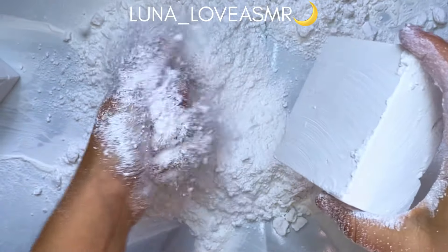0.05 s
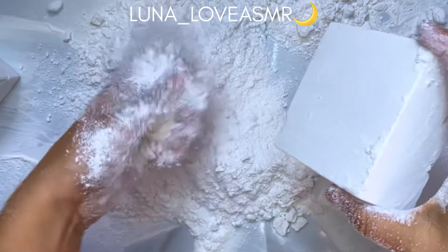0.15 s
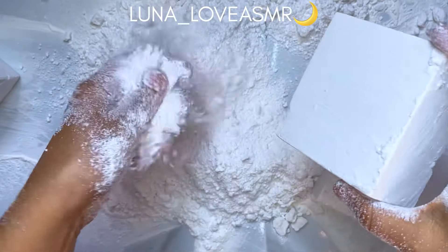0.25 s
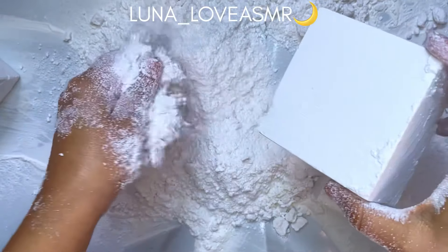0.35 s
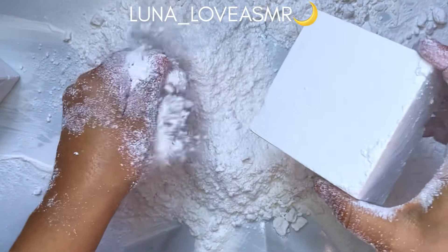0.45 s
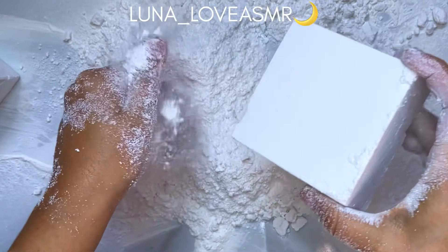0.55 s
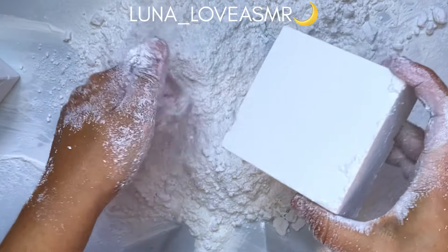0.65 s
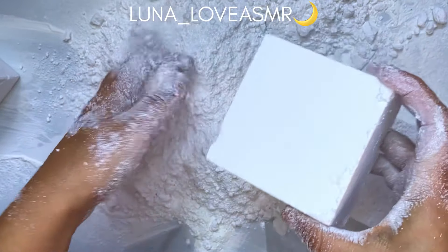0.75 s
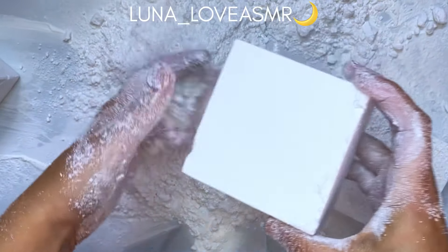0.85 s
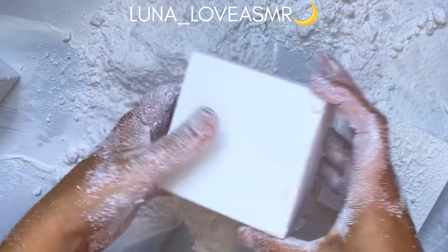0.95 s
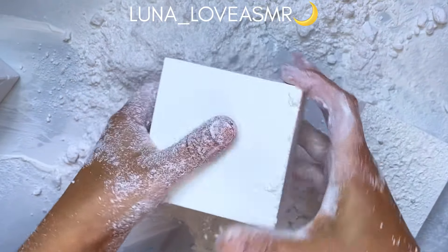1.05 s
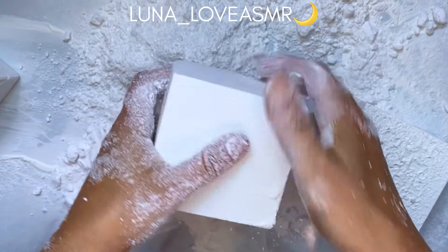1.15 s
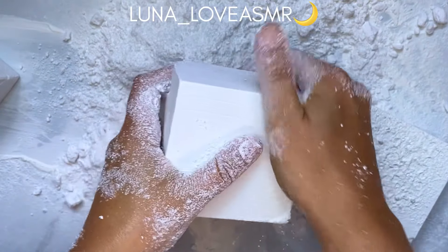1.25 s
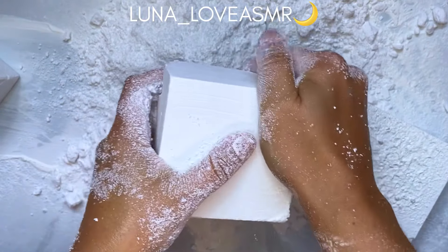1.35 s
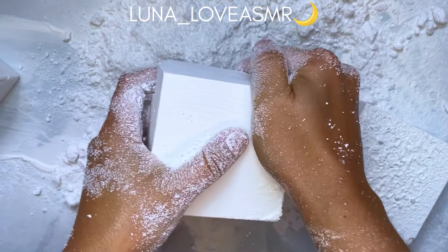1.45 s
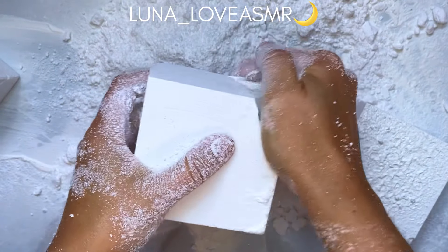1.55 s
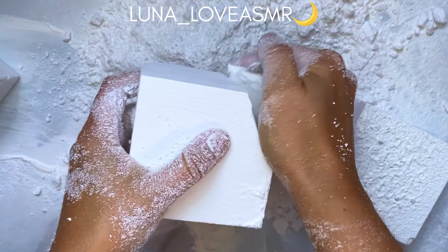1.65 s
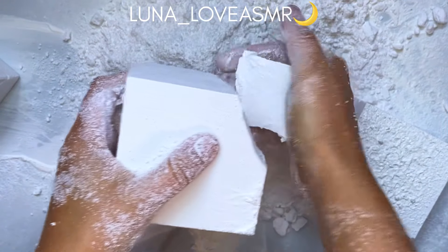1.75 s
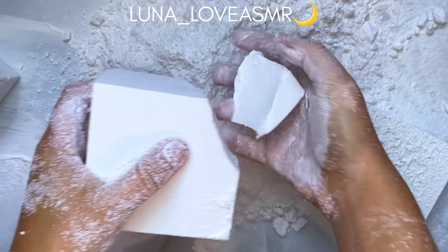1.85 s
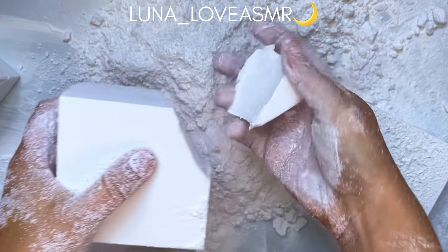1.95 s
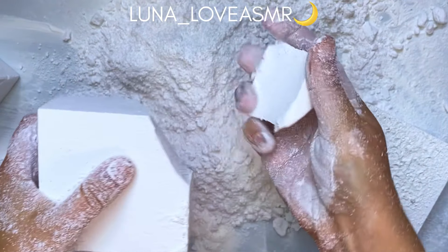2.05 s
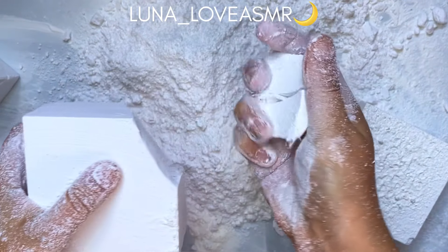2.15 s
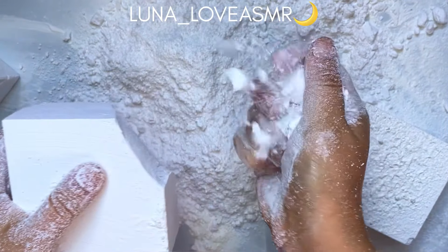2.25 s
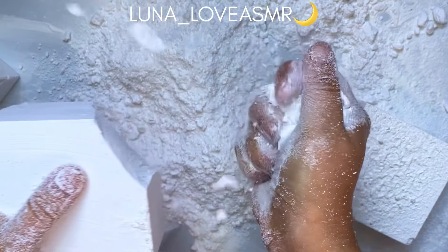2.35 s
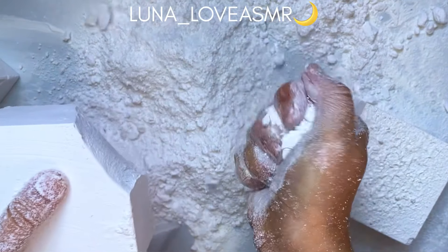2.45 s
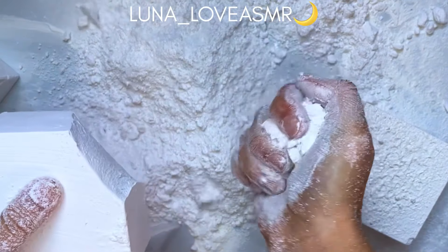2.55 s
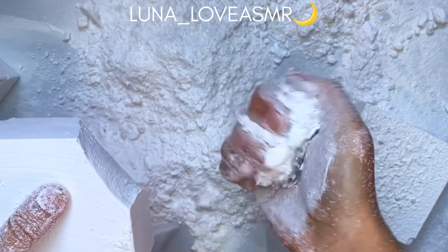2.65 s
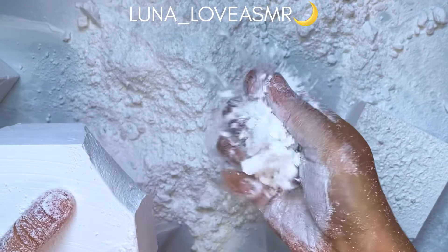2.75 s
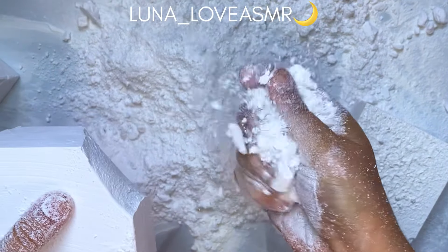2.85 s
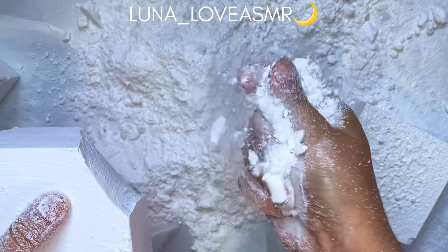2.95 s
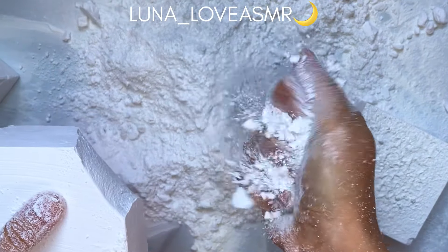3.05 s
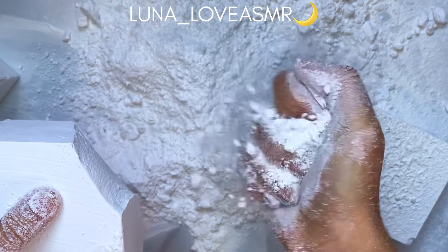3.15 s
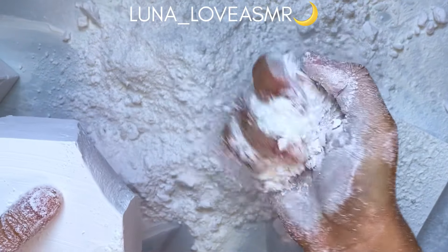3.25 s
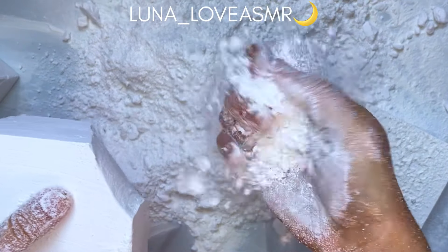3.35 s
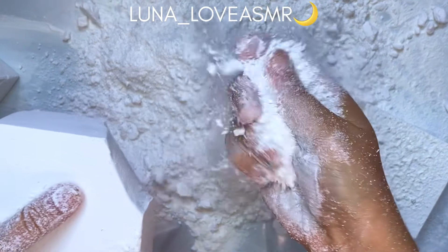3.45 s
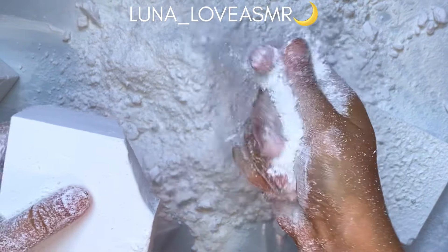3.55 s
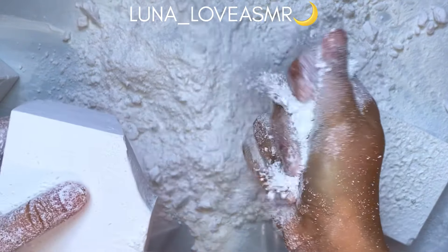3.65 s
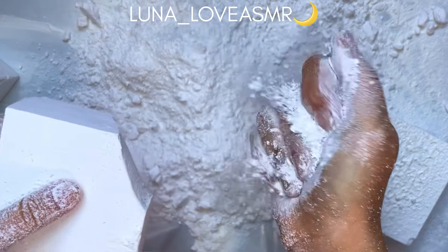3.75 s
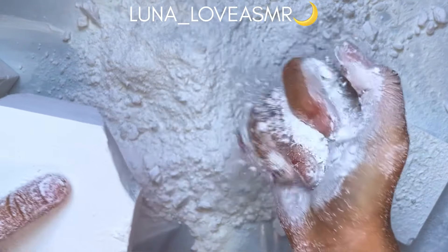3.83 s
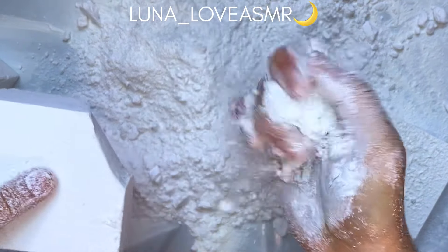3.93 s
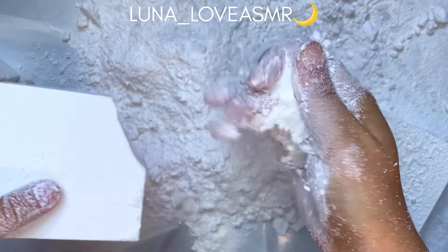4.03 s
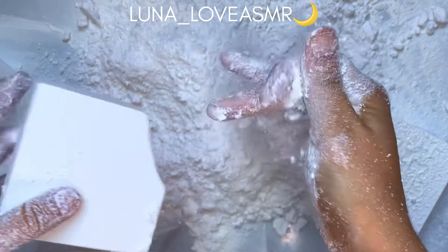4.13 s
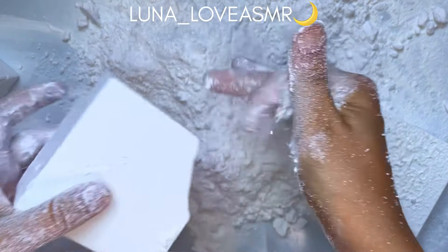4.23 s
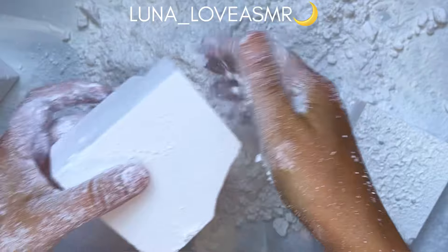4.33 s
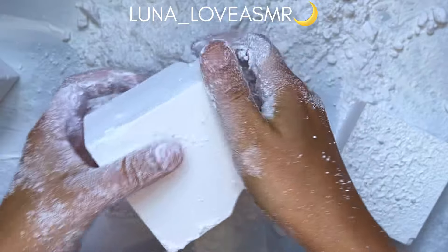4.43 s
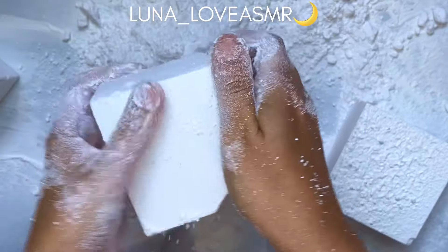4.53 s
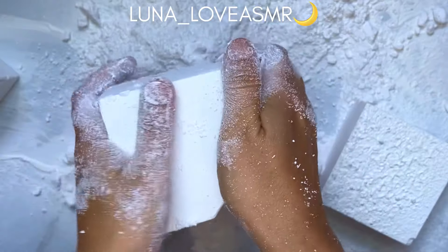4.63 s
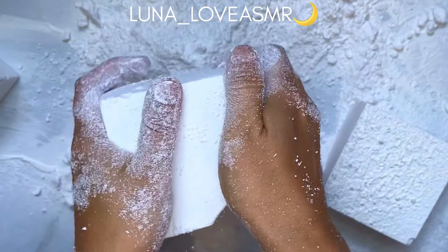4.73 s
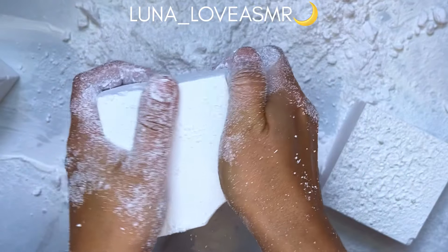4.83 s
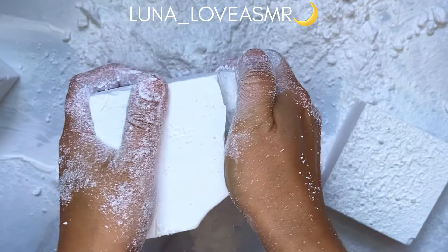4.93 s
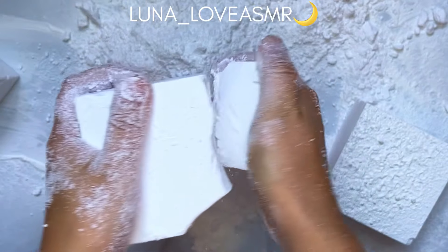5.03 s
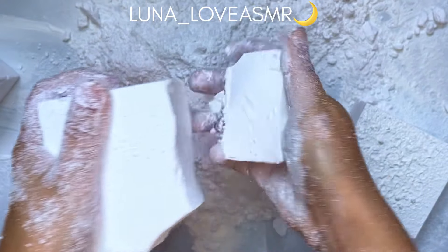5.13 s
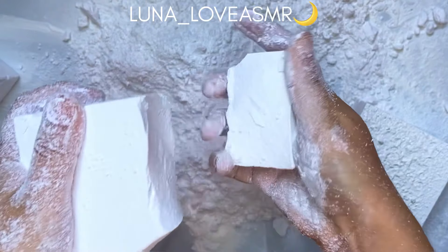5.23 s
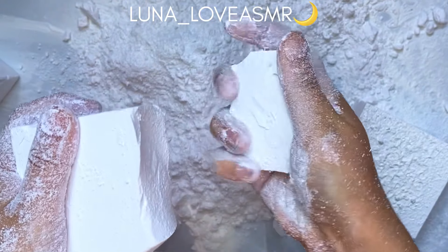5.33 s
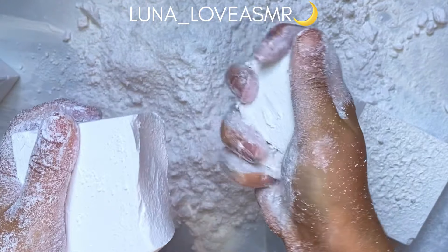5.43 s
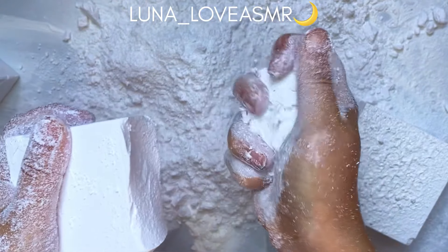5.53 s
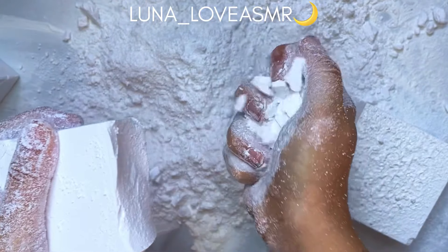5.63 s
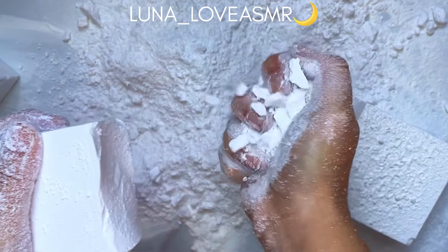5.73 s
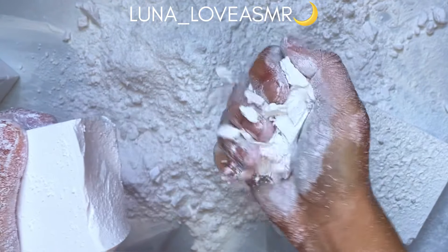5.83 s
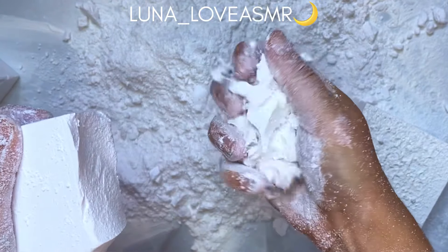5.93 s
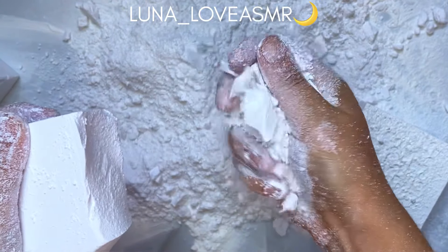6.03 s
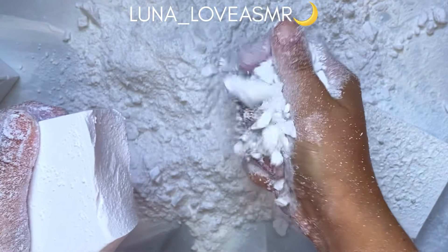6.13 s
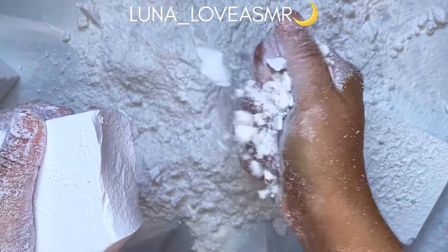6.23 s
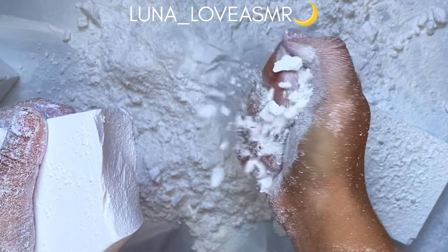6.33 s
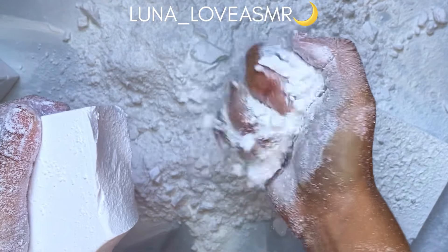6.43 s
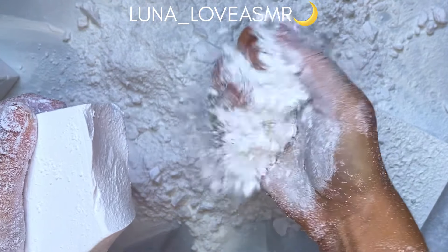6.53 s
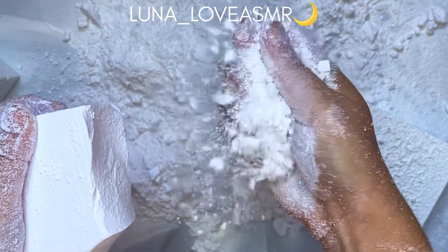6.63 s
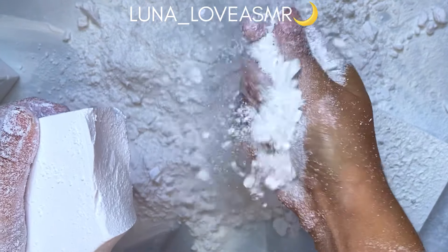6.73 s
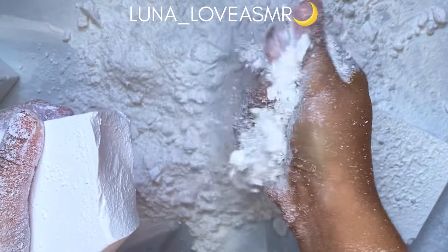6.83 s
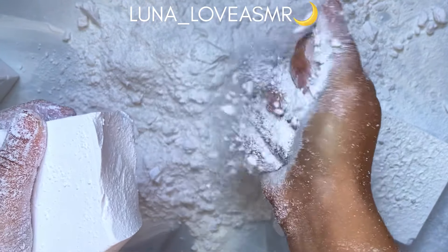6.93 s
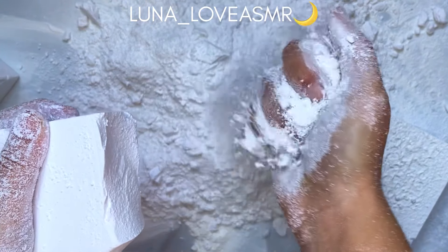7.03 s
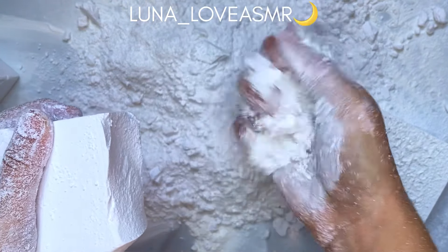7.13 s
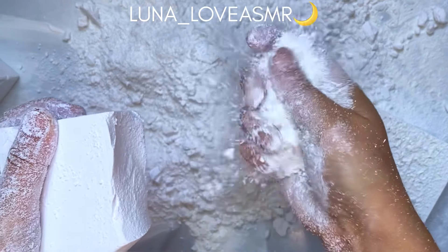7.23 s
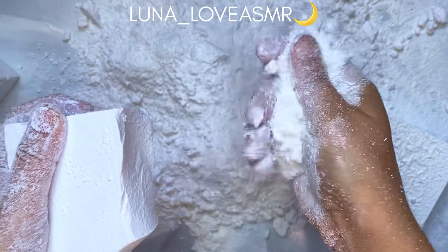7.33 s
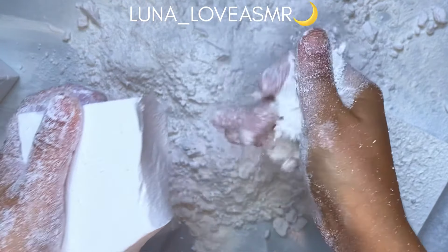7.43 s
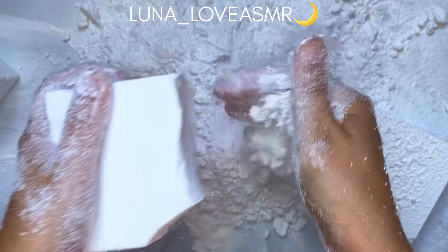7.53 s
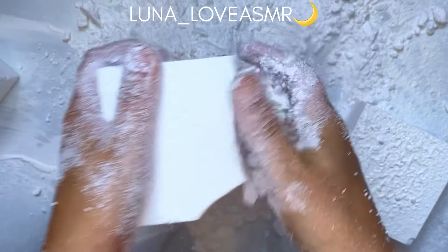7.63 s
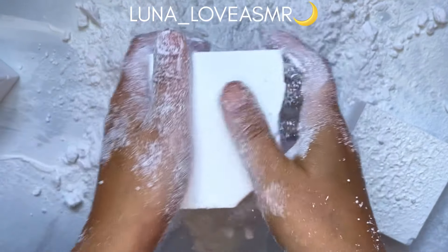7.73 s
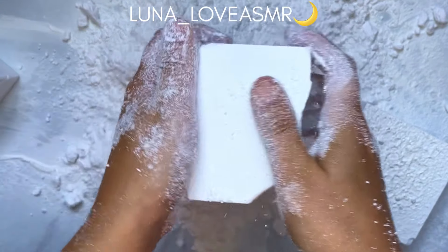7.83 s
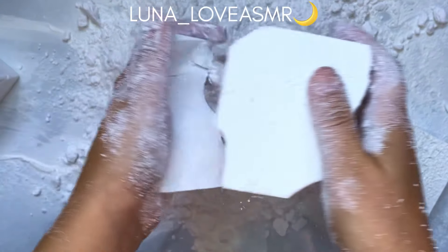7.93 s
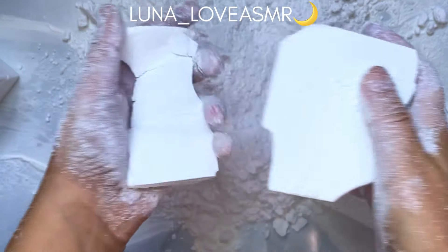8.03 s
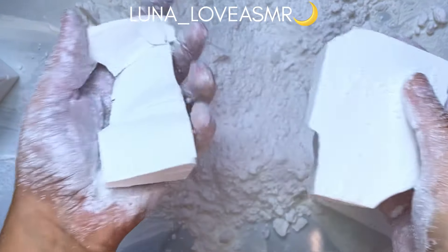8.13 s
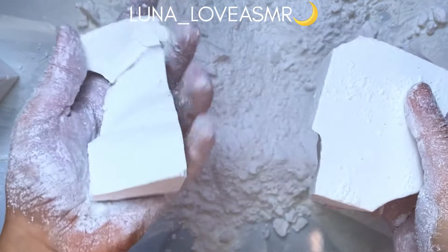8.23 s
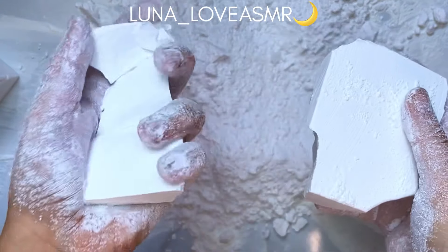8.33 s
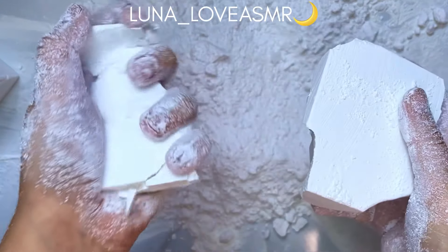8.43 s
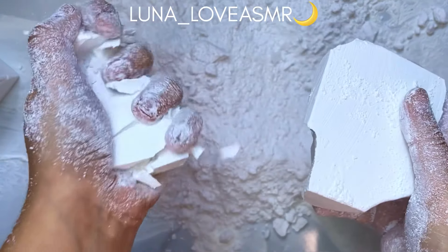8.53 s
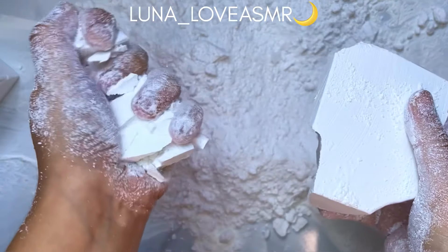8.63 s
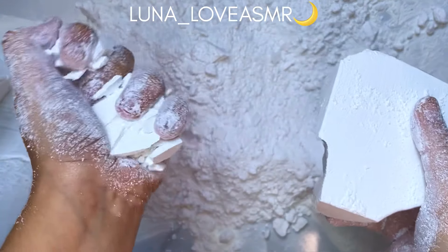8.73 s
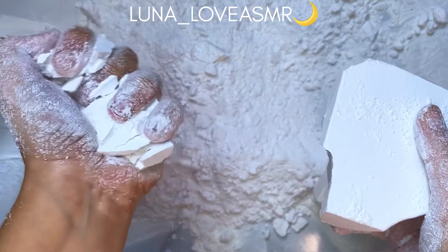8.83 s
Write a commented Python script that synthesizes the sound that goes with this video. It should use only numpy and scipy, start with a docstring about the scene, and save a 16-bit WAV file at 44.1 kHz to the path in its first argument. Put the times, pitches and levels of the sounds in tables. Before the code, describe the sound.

Close, dry stereo in a quiet room with a very faint low hum. From 0 to 1 second, only soft powder rubbing and sparse falling crumbs. Around 1.0-1.2, light knocks and scrapes of the handled block. At 1.5 a firm, dull snap with a short gritty scrape. At 2.15-2.3 the piece is crushed in loud, sharp, overlapping crunches, spilling tiny clicks; smaller ticks, grit and powder hiss fade through 4.2. Soft scrapes near 4.5, then a crisp snap with a dull thump at 4.7-4.85. At 5.35-5.6 bright, hard cracks and thumps, followed by dense grinding, crackles and pattering crumbs, thinning until 7.5. A scrape and low bump at 7.75-7.9, a brief lull, then sharp crushing at 8.35-8.65 with a strong crack near 8.46, ending in small crumbling ticks.

```python
"""In a quiet room with a low hum, hands snap soft chalk and crush it, close to a phone with two microphone ports.
Each break is a crack lasting milliseconds, a ringing burst of noise, then a spill of tiny clicks.
Dull thumps of block and lumps are sinking tones; scrapes are grainy noise ringing like block or piece.
In between, grit grinds in the fist, powder hisses and crumbs patter down: clicks filtered to each colour."""
import sys
import numpy as np
from scipy import signal
from scipy.fft import rfft, irfft
from scipy.io import wavfile
from scipy.ndimage import uniform_filter1d, map_coordinates

SR = 44100
rng = np.random.default_rng(int(sys.argv[2]) if len(sys.argv) > 2 else 0)


def transcribe(signal):
    """Save signal, clipped to [-1, 1], as a 16-bit WAV file at the path in sys.argv[1]."""
    frames = np.atleast_2d(signal).T
    limited = np.clip(frames, -1, 1)
    pcm = np.round(limited * 32767).astype(np.int16)
    wavfile.write(sys.argv[1], SR, pcm)


N = 391608
TIME = np.arange(N) / SR
SHOT = TIME[:8192]  # time axis of one short sound


def undb(db):
    """Turn decibels into gain."""
    return 10 ** (np.asarray(db) / 20)


def unit(x):
    """Scale to an average strength (rms) of 1."""
    return x / np.sqrt(np.mean(x ** 2) + 1e-20)


def bins(x):
    """Frequencies in Hz of the spectrum of x, with zero raised to 1 so logarithms work."""
    return np.maximum(np.fft.rfftfreq(x.shape[-1], 1 / SR), 1)


def colour(x, points, extra_db=0):
    """Filter with the given (Hz, dB) outline; folding the cepstrum stops it ringing ahead of the sound."""
    hz, db = np.transpose(points)
    outline_db = np.interp(np.log(bins(x)), np.log(hz), db) + extra_db
    cepstrum = irfft(np.log(undb(outline_db)))
    half = len(cepstrum) // 2
    cepstrum[1:half] *= 2
    cepstrum[half + 1:] = 0
    return irfft(rfft(x) * np.exp(rfft(cepstrum)))


def walk(rate):
    """Smooth random drift with spread 1, taking about `rate` new values a second."""
    k = int(SR / rate)
    steps = np.repeat(rng.standard_normal(N // k + 1), k)
    smooth = uniform_filter1d(uniform_filter1d(steps, k), k // 2)
    return unit(smooth[:N])


def grains(size, per_s, spread_db):
    """Random clicks of either sign; a positive spread makes a few extra large, a negative one a few extra small."""
    strength = undb(spread_db * np.minimum(rng.exponential(size=size), 5))
    happens = rng.random(size) < per_s / SR
    return unit(happens * rng.standard_normal(size) * strength)


def add(track, s, sound):
    """Mix a sound in at time s."""
    i = max(int(s * SR), 0)
    track[i:i + len(sound)] += sound[:N - i]


# tone of the quiet room rumble: (f/Hz, level/dB)
ROOM_COLOUR = [(20, 1.5), (45, 5), (62, 6), (100, 1.5), (160, -6), (350, -15), (700, -13.5), (2000, -26.5),
               (6000, -58), (16000, -30.5)]


def background(hum_hz=51.1, hum_db=-47.5, waver_db=1.26, waver_hz=0.25, room_db=-59.0):
    """A low hum, wavering slightly in pitch and level, over the filtered noise of the room's rumble."""
    phase = 2 * np.pi * np.cumsum(hum_hz + waver_hz * walk(9.2)) / SR
    hum = unit(np.sin(phase)) * undb(hum_db + waver_db * walk(13))
    rumble = unit(colour(rng.standard_normal(N), ROOM_COLOUR))
    return hum + undb(room_db) * rumble


def gestures(rows, attack_s, release_s, idle_db):
    """Level in dB of (start, length, dB) gestures that swell, hold and die away; overlapping powers add."""
    power = np.full(N, undb(idle_db) ** 2)
    for start, length, db in rows:
        # the gesture is worked out only near its own time
        near = slice(max(int((start - .2) * SR), 0), int((start + length + .4) * SR))
        t = TIME[near] - start
        swell = np.minimum(t, 0) / attack_s
        fade = np.maximum(t - length, 0) / release_s
        power[near] += (undb(db) * np.exp(swell - fade)) ** 2
    return 10 * np.log10(power)


# basic tone of a break, before its own ring and treble: (f/Hz, level/dB)
CRACK_COLOUR = [(150, -28.5), (350, -11), (540, -11), (800, -3.5), (1800, -1), (2550, -2), (3500, -2),
                (5000, -2.5), (7500, -4), (11000, -5.5), (16000, -10)]


def crack(ring_hz, treble_db, run_s=.0003, ring_db=10, ring_octaves=0.59,
          bend_s=0.000505, rasp_db=-10, rasp_s=0.0027):
    """One break rings the piece for a cycle or two; the parting faces rasp for a few milliseconds."""
    t = SHOT[:1024]
    hz = bins(t)
    # a ragged run of tiny breaks, nearly even in strength over all pitches
    tearing = rfft(rng.standard_normal(len(t)) * t * np.exp(-t / run_s))
    even = tearing / np.abs(tearing) ** .7
    tearing = irfft(even * np.exp(-2j * np.pi * hz * run_s))  # delayed by run_s
    rasp = rng.standard_normal(len(t)) * np.exp(-t / rasp_s)
    push = unit(tearing * np.exp(-t / rasp_s)) + undb(rasp_db) * unit(rasp)
    ring = ring_db * np.exp(-.5 * (np.log2(hz / ring_hz) / ring_octaves) ** 2)
    treble = treble_db * hz ** 2 / (hz ** 2 + 4500 ** 2)
    sound = colour(push, CRACK_COLOUR, ring + treble)
    # bending waves are slower at low pitch, so each crack chirps downwards; bend_s is the delay at 1000 Hz
    sound = irfft(rfft(sound) * np.exp(-4j * np.pi * bend_s * np.sqrt(1000 * hz)))
    return unit(sound) * np.sqrt(0.0023 / t[-1])  # as much energy as 2.3 ms at rms 1


def chips(grit_level, count=480, chip_db=1.0, range_db=7, treble_db=-2):
    """Small lumps give way at random, each with its own pitch, as strongly as the hand grinds."""
    out = np.zeros(N)
    for when, size, pitch in rng.random((count, 3)):
        db = grit_level[int(when * N)] + chip_db + range_db * size ** 2
        tick = crack(900 * 5.5 ** pitch, treble_db, ring_db=13.0, ring_octaves=0.11, rasp_db=-16.5)
        add(out, when * N / SR, undb(db) * tick)
    return out


# squeezes of the fist on broken chalk, before the overall trims:
# (start t/s, length t/s, grit level/dB, powder hiss level/dB)
SQUEEZES = [(0.0, 0.051, -54.5, -55.5), (0.11, 0.051, -55.5, -58.5), (0.246, 0.052, -56.5, -63.5),
            (0.528, 0.068, -54.5, -57.5), (0.64, 0.056, -58, -68), (0.981, 0.012, -54, -59),
            (1.383, 0.016, -58, -63.5), (1.513, 0.046, -42, -58), (2.149, 0.14, -44.5, -45),
            (2.324, 0.19, -52.5, -54), (2.558, 0.16, -51, -57), (2.711, 0.052, -49, -54.5),
            (2.813, .15, -48, -52), (2.994, 0.17, -51, -54.5), (3.194, 0.041, -45, -50),
            (3.268, 0.083, -60, -60), (3.365, 0.13, -51, -58), (3.507, 0.29, -56.5, -56.5),
            (3.815, 0.052, -49.5, -52.5), (3.925, 0.21, -62, -59), (4.144, 0.099, -53, -55.5),
            (4.708, 0.037, -51, -54), (4.827, 0.023, -42, -43.5), (4.955, 0.022, -57, -58.5),
            (5.525, 0.063, -43, -44), (5.34, 0.069, -67, -54.5), (5.635, 0.35, -54.5, -57.5),
            (5.965, 0.084, -42.5, -47.5), (6.077, 0.068, -45, -51), (6.186, 0.22, -56.5, -54.5),
            (6.38, 0.084, -45.5, -53.5), (6.492, 0.12, -46, -52), (6.642, 0.088, -49, -50.5),
            (6.755, 0.29, -55, -54.5), (7.019, 0.035, -50, -62), (7.113, 0.067, -61, -56.5),
            (7.204, 0.1, -52.5, -60.5), (7.355, 0.36, -57.5, -58), (7.728, 0.15, -58, -53.5),
            (8.298, 0.058, -60, -59.5), (8.378, 0.18, -44.5, -46), (8.6, 0.14, -61, -51.5),
            (8.763, 0.041, -61, -56)]
# showers of crumbs and powder landing on the heap, before the trim: (start t/s, length t/s, level/dB)
SHOWERS = [(0.17, 0.56, -57.5), (1.0, 0.44, -59), (1.55, 0.16, -56.5), (2.44, 0.048, -47),
           (3.05, 0.026, -48), (3.37, 0.082, -56), (3.46, 0.25, -57), (3.97, 0.074, -55),
           (4.12, 0.083, -51), (4.29, 0.4, -52), (4.64, 0.26, -51), (5.35, 0.27, -48), (5.98, 0.19, -49.5),
           (6.3, 0.34, -55.5), (6.62, 0.19, -53.5), (6.76, 0.3, -56.5), (7.27, .24, -59),
           (7.54, 0.042, -51.5), (7.7, 0.16, -50.5), (8.12, 0.042, -56)]
# tone of grinding grit: (f/Hz, level/dB)
GRIT_COLOUR = [(200, -26), (550, -9), (900, -3), (1700, 1.5), (2400, -4.5), (3500, -2), (6000, -18.5),
               (15000, -37.5)]
# tone of rubbed powder, also used by the scrapes: (f/Hz, level/dB)
POWDER_COLOUR = [(600, -20.5), (2400, -6), (3500, -5), (5000, 0.5), (7500, -1.5), (10000, -4.5),
                 (13000, -5), (16000, -9)]
# dull tone of landing crumbs, also used for the rattle of the thumps: (f/Hz, level/dB)
PATTER_COLOUR = [(40, -6.5), (80, 7.5), (115, 2.5), (170, -2.5), (280, 3), (400, -0.5), (550, -7.5),
                 (1000, -16.5), (3000, -41.5)]


def crumbling(grit_db=-2, hiss_db=2.0, patter_db=-1, slip_db=1.5, size_db=10):
    """Grit breaks in fits and starts, powder hisses with it, and crumbs land softly on the heap."""
    start, length, grit_dbs, hiss_dbs = np.transpose(SQUEEZES)
    # the fist tightens and lets go; powdered hands never lie quite still, hence the idle levels
    fist = dict(attack_s=0.0049, release_s=0.03)
    grit_level = gestures(zip(start, length, grit_dbs), **fist, idle_db=-70)
    hiss_level = gestures(zip(start, length, hiss_dbs), **fist, idle_db=-68)
    # a shower builds up, and trickles out
    patter_level = gestures(SHOWERS, attack_s=0.017, release_s=0.025, idle_db=-62.5)
    slips = slip_db * walk(70)
    # crumbs of different sizes ring at different pitches, and each size comes in its own clumps
    octave = np.log2(bins(TIME))
    grit = np.zeros(N)
    for k in range(5):
        ring = size_db * np.cos(2 * np.pi * (octave + k / 5))
        clumps = grains(N, per_s=320, spread_db=0.9) * undb(1.1 * walk(40))
        grit += colour(clumps, GRIT_COLOUR, ring)
    hiss = colour(grains(N, per_s=7300, spread_db=-0.5), POWDER_COLOUR)
    patter = colour(grains(N, per_s=700, spread_db=0.5), PATTER_COLOUR)
    grit = unit(grit) * undb(grit_level + grit_db + slips)
    hiss = unit(hiss) * undb(hiss_level + hiss_db + slips / 2)
    patter = unit(patter) * undb(patter_level + patter_db)
    return grit + hiss + patter + chips(grit_level)


# broken faces and fingers sliding over chalk:
# (peak t/s, level/dB, rise t/s, fall t/s, what rings: 0 block to 1 loose piece)
SCRAPES = [(0.38, -49.5, 0.029, 0.037, 0), (0.54, -55.5, 0.1, .05, 0.35), (0.986, -45, 0.0077, 0.026, 0.3),
           (1.09, -45, 0.048, 0.05, 0), (1.22, -45.5, 0.1, 0.051, 0.095), (1.519, -27, 0.0047, 0.015, 0.53),
           (1.539, -25.5, 0.0076, 0.02, 0.25), (1.67, -51, 0.075, 0.033, 0.068),
           (2.08, -43.5, 0.016, 0.033, 0.45), (2.236, -32, 0.0077, 0.011, 0.1),
           (2.57, -44, 0.035, 0.033, 0.59), (4.45, -50, 0.055, 0.075, 0), (4.55, -47.5, 0.047, 0.039, 0.15),
           (4.765, -49.5, 0.1, 0.015, 0.47), (4.842, -38.5, 0.0093, 0.033, 0.4),
           (5.13, -49, 0.0056, 0.023, 0.61), (5.248, -41.5, 0.019, 0.027, 0.89),
           (5.53, -27.5, 0.0085, 0.018, 0), (7.891, -31.5, 0.028, 0.013, 0.23),
           (8.48, -37.5, 0.0075, 0.015, 1)]
# what the rubbed block rings with, before the grip shifts it: (f/Hz, width f/Hz, level/dB)
BLOCK_MODES = [(1720, 300, 3), (3450, 280, 8), (3950, 190, 7.5), (4820, 330, 6.5), (7710, 2300, 9),
               (12400, 3800, 7.5)]
# what a loose piece rings with, before the grip shifts it: (f/Hz, width f/Hz, level/dB)
PIECE_MODES = [(2870, 440, 25), (5060, 380, 17), (8000, 700, 6.5), (12700, 2400, 13)]


def resonances(f, modes):
    """Boost in dB at each frequency f: every mode is a peak that halves in dB at the edges of its width."""
    return sum(peak / (1 + (2 * (f - hz) / width) ** 2) for hz, width, peak in modes)


def scrapes(grip_octaves=0.015, chatter_db=2.0, glide_per_s=0.3):
    """Short strokes of powder dragged over chalk; skin catches and slips, and pitch rises as the grip slides."""
    out = np.zeros(N)
    t = TIME[:32768] - TIME[16384]  # zero at the peak of the stroke
    grips = rng.uniform(-0.67, 1, len(SCRAPES))
    for (s, db, rise, fall, loose), grip in zip(SCRAPES, grips):
        f = bins(t) * 2 ** (grip_octaves * grip)
        block = resonances(f, BLOCK_MODES)
        piece = resonances(f, PIECE_MODES)
        ring = block + loose * (piece - block)
        rub = unit(colour(grains(len(t), per_s=16000, spread_db=-3.5), POWDER_COLOUR, ring))
        # read the noise faster and faster, so its pitch climbs
        rub = map_coordinates(rub, [np.cumsum(1 + glide_per_s * t)], order=5, mode="mirror")
        stroke = np.exp(-np.maximum(-t / rise, t / fall))
        add(out, s + t[0], undb(db) * stroke * rub)
    return out * undb(chatter_db * walk(90))


# dull knocks of block and lumps against hand and tray: (t/s, knock peak level/dB, settled f/Hz, 60 dB fall t/s)
THUMPS = [(0.984, -36.5, 264, 0.009), (1.009, -31, 86.5, 0.048), (1.5057, -9.5, 240, 0.011),
          (1.513, -25.5, 117, 0.03), (1.56, -36, 85, 0.045), (2.155, -25, 231, 0.023),
          (2.214, -34.5, 169, 0.033), (2.281, -33.5, 197, 0.019), (2.46, -31, 316, 0.036),
          (3.063, -42, 232, 0.034), (3.196, -38.5, 305, 0.017), (4.146, -43, 234, 0.033),
          (4.706, -27.5, 242, 0.0089), (4.829, -19, 175, 0.013), (4.835, -35, 101, 0.07),
          (5.419, -24.5, 328, 0.021), (5.435, -18, 265, 0.013), (5.521, -30, 268, 0.028),
          (6.321, -45, 306, 0.022), (6.62, -36.5, 404, 0.0094), (7.75, -35.5, 396, 0.02),
          (7.761, -33, 104.6, 0.069), (8.467, -30.5, 405, 0.015), (8.65, -36.5, 198, 0.038)]


def thumps(glide=0.81, settle_s=0.0022, rise_s=0.0018, rattle_db=-20, rattle_s=0.028):
    """Heavily damped knocks whose pitch sinks as the contact relaxes, with a dull fading rattle."""
    out = np.zeros(N)
    for s, db, hz, t60 in THUMPS:
        pitch = hz * (1 + glide * np.exp(-SHOT / settle_s))
        phase = 2 * np.pi * np.cumsum(pitch) / SR
        knock = np.sin(phase) * (1 - np.exp(-SHOT / rise_s)) ** 2 * undb(-60 * SHOT / t60)
        rattle = unit(colour(rng.standard_normal(len(SHOT)), PATTER_COLOUR)) * np.exp(-SHOT / rattle_s)
        add(out, s, undb(db) * (knock / np.abs(knock).max() + undb(rattle_db) * rattle))
    return out


# chalk breaking: (t/s, level/dB, main ring f/Hz, treble level/dB)
CRACKS = [(1.5042, -16, 1440, 2), (1.517, -32, 1900, -6), (1.5587, -30.5, 1400, -3),
          (2.071, -41.5, 6500, -9), (2.091, -44, 7000, 10), (2.1207, -39, 7000, 17),
          (2.1528, -8.5, 1230, -5.5), (2.192, -17, 6500, -16), (2.2103, -4.5, 3050, -4),
          (2.2119, -12, 1920, -9), (2.2124, -14, 1500, 5), (2.2368, -24, 3400, -7),
          (2.242, -19.5, 3820, -8), (2.251, -20, 6990, -21), (2.2768, -17, 970, -9), (2.3314, -38, 3600, 0),
          (2.3565, -43, 3800, -1), (2.405, -33, 6030, 4), (2.4247, -30, 3140, -14), (2.4571, -27, 750, -5),
          (2.4771, -34.5, 1710, 2), (2.495, -35.5, 3620, 0), (2.556, -37.5, 7000, 14),
          (2.5625, -39, 7000, 14), (2.6922, -29.5, 3400, -22), (2.731, -44.5, 1800, -6),
          (2.7773, -45.5, 1720, -6), (2.829, -42, 1500, -16), (2.869, -27.5, 4100, -13),
          (2.901, -44, 1300, -8), (2.922, -43, 4200, -4), (3.05, -34, 870, -10), (3.06, -34, 7100, -29),
          (3.14, -45, 930, -31), (3.1965, -49, 1200, -8), (3.207, -39, 1580, -11),
          (3.3704, -42.5, 1960, -6), (3.4116, -41, 3400, -5), (3.4534, -39.5, 7000, 4),
          (3.459, -34, 850, -30), (3.609, -39.5, 3420, -7), (3.752, -45, 1010, -26),
          (3.8077, -43, 3000, -5), (3.851, -40.5, 990, -16), (3.897, -41.5, 5110, 7),
          (4.0058, -43, 1930, 2), (4.0267, -45, 4300, -2), (4.0336, -38.5, 2260, -8),
          (4.124, -45, 1000, -1), (4.1444, -37.5, 1390, -25), (4.7029, -23.5, 1683, 15.5),
          (4.7138, -36, 1570, -7), (4.7585, -39, 1980, -7), (4.7717, -35, 1980, 10),
          (4.8261, -15.5, 1780, 20), (4.859, -28, 1000, -15), (4.863, -27.5, 1690, -22),
          (4.958, -38, 2150, -2), (5.199, -39.5, 6900, 21), (5.3445, -24, 4600, 11),
          (5.3669, -19, 4800, -6), (5.4164, -5.5, 3780, -34), (5.4345, -12, 1170, -6.5),
          (5.4794, -23, 5190, 9), (5.5007, -34, 1460, -11), (5.5165, -12, 4330, -4.5),
          (5.5536, -27.5, 1280, -7), (5.5646, -27.5, 4150, 7), (5.588, -34, 4800, -6),
          (5.5987, -41, 1460, 0), (5.612, -28.5, 5190, 8), (5.6499, -40, 4900, 7), (5.692, -33.5, 7000, 16),
          (5.718, -37, 3900, 6), (5.7713, -31.5, 7000, 17), (5.8355, -36, 1670, -29),
          (5.9033, -44.5, 4760, -20), (6.0056, -39, 1460, -8), (6.0135, -36, 1290, -13),
          (6.053, -39, 3600, -2), (6.0779, -28.5, 7000, 0), (6.1403, -33, 1230, -6),
          (6.1972, -40.5, 4200, 13), (6.2496, -33.5, 7000, -12), (6.274, -37.5, 1460, 8),
          (6.3193, -38, 780, -5), (6.429, -40, 1700, -8), (6.443, -39, 1470, -13),
          (6.466, -37.5, 3900, -12), (6.5439, -38.5, 6960, -6), (6.6135, -36.5, 800, 5),
          (6.6702, -39, 1010, 5), (6.7109, -38.5, 1780, 1), (6.7994, -33.5, 6100, -12),
          (6.8764, -38, 1050, 9), (6.8942, -46, 1720, -9), (6.955, -44, 7000, 13),
          (7.0303, -40.5, 1890, -4), (7.0596, -39, 2030, -11), (7.2218, -40, 1830, -20),
          (7.3298, -44.5, 7000, 7), (7.4314, -42, 1290, 0), (7.53, -46, 1550, -15), (7.542, -37, 1270, -7),
          (7.6933, -41.5, 620, 0), (7.808, -44.5, 1280, -11), (8.269, -47, 6650, -4),
          (8.314, -46, 1760, -1), (8.355, -36.5, 1800, 0), (8.3618, -23.5, 806, 27), (8.368, -26, 1890, -9),
          (8.383, -33, 1610, 7), (8.401, -24.5, 2850, 3), (8.4114, -24.5, 790, 8), (8.4422, -26, 4940, 2),
          (8.45, -22.5, 6760, -22), (8.4647, -6, 4150, -14), (8.4727, -26, 1700, -17),
          (8.5025, -35, 1270, -10), (8.5219, -42, 7000, 13), (8.5444, -28.5, 1250, -1),
          (8.5498, -33, 3700, -11), (8.586, -28, 1340, 12), (8.6222, -36, 3450, 3), (8.6274, -36, 3700, -2),
          (8.6433, -12.5, 1700, -1), (8.6437, -15.5, 4830, -3), (8.7682, -35.5, 1310, 0),
          (8.7742, -25.5, 4530, -14), (8.8317, -39, 1900, 14), (8.836, -36.5, 7000, -5)]
# tone of grains spilling from a break: (f/Hz, level/dB)
SPILL_COLOUR = [(70, -22.5), (170, -9.5), (350, -4), (550, -10), (1000, -11), (2000, -7), (5000, -3.5),
                (9000, -13), (16000, -20)]


def fractures(spill_db=-25, spill_growth=0.7, spill_s=0.028,
              shatter_db=-18, fragment_db=-23, fragment_s=0.04):
    """Cracks, each with a short spill of grains from fresh faces; bigger breaks shed more and throw fragments."""
    out = np.zeros(N)
    for s, db, ring_hz, treble_db in CRACKS:
        grown_db = spill_growth * db  # dB of debris per dB of crack
        spill = unit(colour(grains(len(SHOT), per_s=7600, spread_db=2.0), SPILL_COLOUR))
        spill = spill * np.exp(-SHOT / spill_s)
        add(out, s, undb(db) * crack(ring_hz, treble_db))
        add(out, s, undb(spill_db + grown_db) * spill)
        if db > shatter_db:
            for late, pitch in rng.random((5, 2)):
                tick = crack(1000 * 4.5 ** pitch, 0, ring_octaves=0.15)
                add(out, s + late * fragment_s, undb(fragment_db + grown_db) * np.exp(-late) * tick)
    return out


def reflections(x, t60, wet_db):
    """Nearby surfaces return a short faint tail of fading noise, different at each port."""
    fade = undb(-60 * SHOT / t60) * (SHOT > .001)  # nothing returns in the first millisecond
    tails = rng.standard_normal((2, len(SHOT))) * fade
    return undb(wet_db) * np.array([signal.fftconvolve(x, h / np.linalg.norm(h))[:N] for h in tails])


# phase between the two ports: (f/Hz, radians by which the left leads)
PORT_PHASE = [(0, 0), (500, -.5), (1650, -.2), (2670, 2.3), (3620, 1.2), (5100, 1.6), (5750, 3.1),
              (6250, 3.3), (7580, 6.1), (8790, 6.7), (9730, 9.2), (10900, 9.6), (11800, 12.4),
              (13000, 12.7), (14000, 15.4), (15900, 16)]
# level between the two ports: (f/Hz, left minus right level/dB)
PORT_BALANCE = [(60, 0), (200, -2), (380, -3.2), (700, -1), (1300, -.3), (4400, -1), (8000, 0)]


def ports(x):
    """Sound bends round the phone and reaches its two ports with different phase and level."""
    hz = bins(x)
    phase = np.interp(hz, *np.transpose(PORT_PHASE))
    balance_db = np.interp(hz, *np.transpose(PORT_BALANCE))
    spectrum = rfft(x)
    # each port takes half of the difference: left, then right
    return np.array([irfft(spectrum * undb(side * balance_db) * np.exp(1j * side * phase), N)
                     for side in (.5, -.5)])


def scene():
    """All the chalk sounds and the hum at the two ports, with reflections of the chalk."""
    chalk = crumbling() + scrapes() + thumps() + fractures()
    tray = reflections(chalk, t60=0.069, wet_db=-15)
    walls = reflections(chalk, t60=0.2, wet_db=-13.5)
    return ports(chalk + background()) + tray + walls


def record(dry):
    """The microphone drops the deepest bass, peaks beyond full scale clip, and the top is cut."""
    bass_cut = signal.butter(3, 38, "high", fs=SR, output="sos")
    top_cut = signal.ellip(8, .2, 70, 15750, fs=SR, output="sos")
    sound = signal.sosfilt(bass_cut, dry)
    return signal.sosfilt(top_cut, np.clip(sound, -1, 1))


dry = scene()
out = record(dry)
transcribe(out)
```